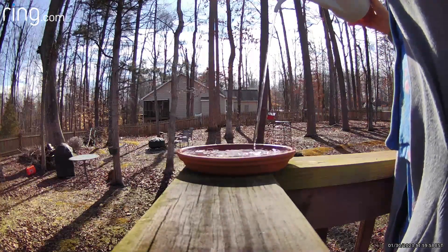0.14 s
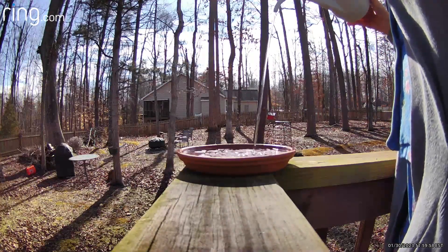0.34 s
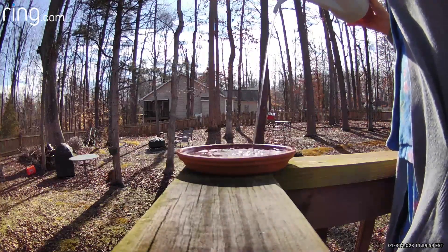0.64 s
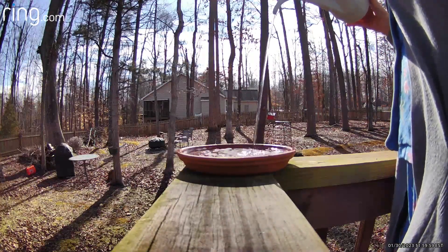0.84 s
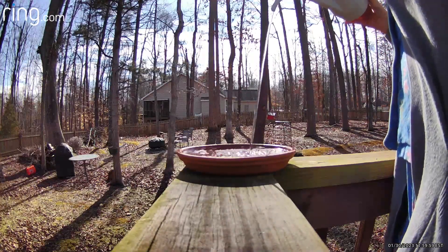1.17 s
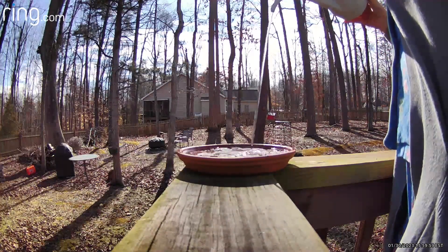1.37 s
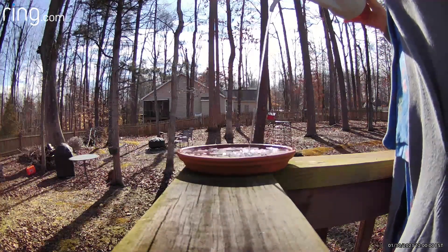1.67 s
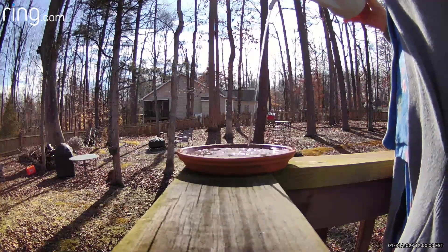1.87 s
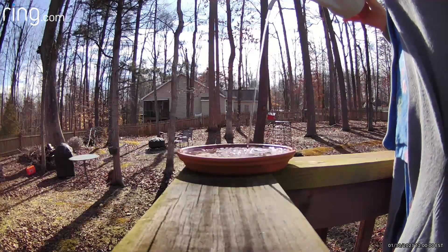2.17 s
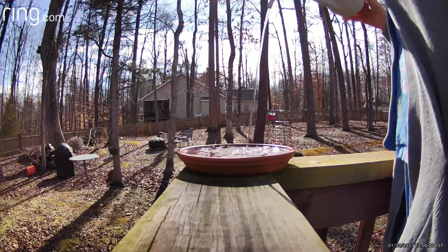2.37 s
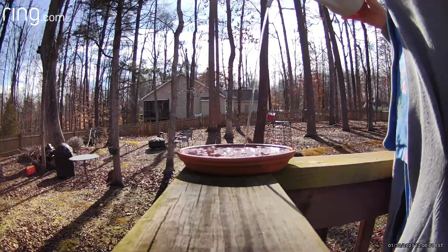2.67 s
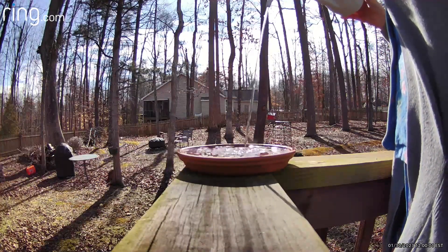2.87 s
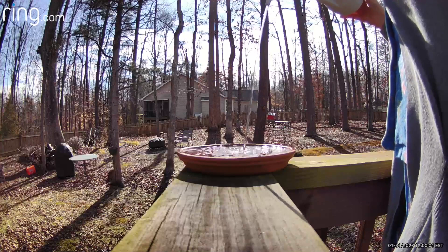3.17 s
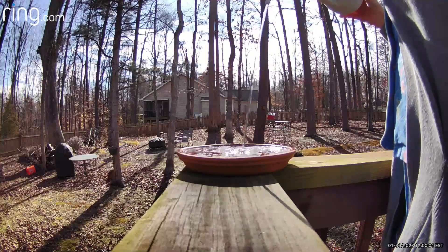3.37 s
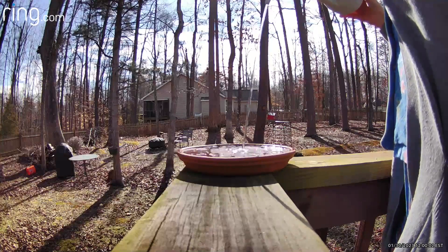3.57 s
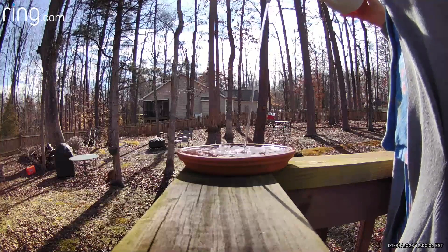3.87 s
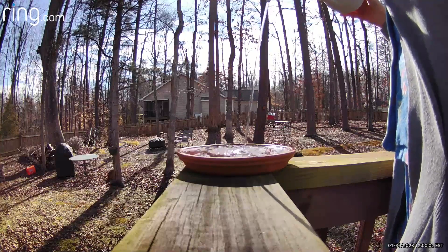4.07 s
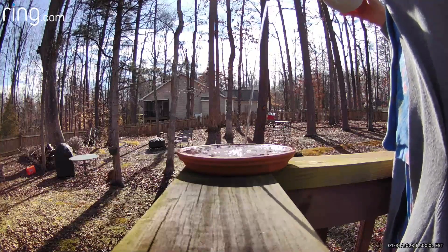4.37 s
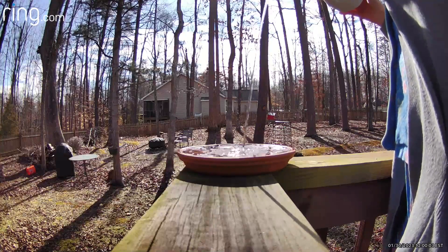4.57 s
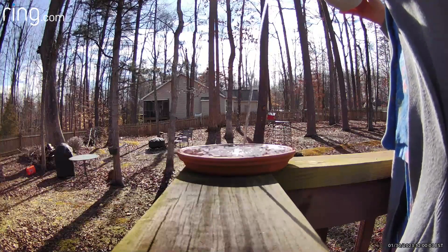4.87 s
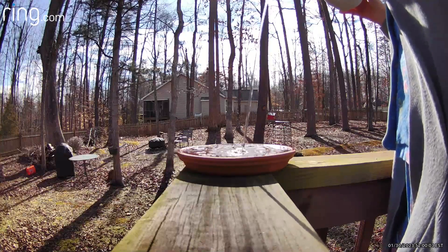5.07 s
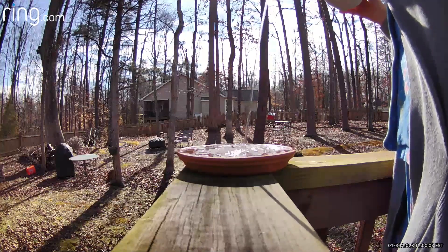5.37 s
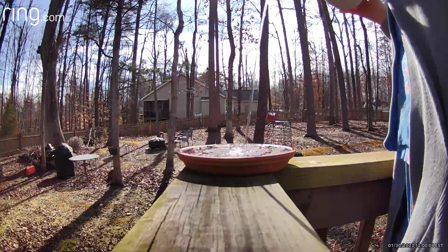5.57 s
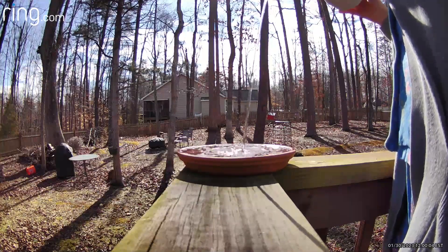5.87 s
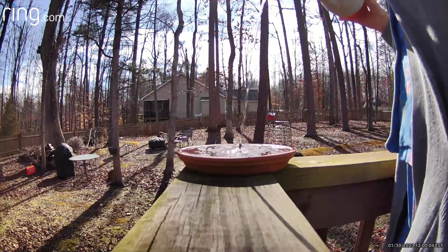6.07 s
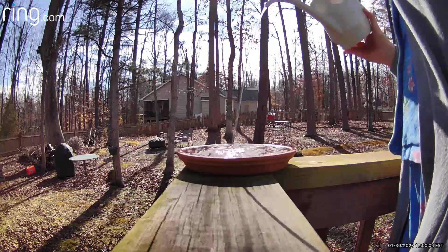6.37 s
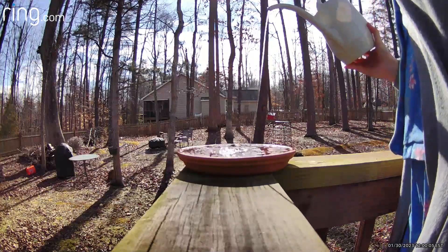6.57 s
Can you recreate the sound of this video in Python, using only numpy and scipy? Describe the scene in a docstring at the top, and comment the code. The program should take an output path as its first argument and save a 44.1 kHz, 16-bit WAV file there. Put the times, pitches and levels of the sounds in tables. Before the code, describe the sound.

Close mono pickup of water being poured from a can into a birdbath in a quiet yard. First a smooth, thin, bubbly trickle with a few high plinks, gradually weakening until almost silent. Then the stream comes back abruptly, lumpier and louder, with many bright bubble pops, round low plops and a wavering ring from the dish. Little bass, faint rail rumble, barely audible air behind.

```python
"""First an even patter with fine spray and bright plinks: a thin stream into a birdbath on an outdoor deck rail.
It thins to a few drops, then returns in lumps that slap the water and ring the dish.
Patter and spray are crowds of small gliding bubble tones mixed with patchy noise; the dish is a set of resonances.
Plinks and round low notes are single rising tones. Low noise drums on the rail, a hollow tone gurgles late.
Faint air lies behind. All is heard in mono, dull above 7 kHz; no distances are modelled."""
import sys
import numpy as np
from scipy import signal
from scipy.fft import rfft, irfft, next_fast_len
from scipy.io import wavfile
from scipy.ndimage import uniform_filter1d, map_coordinates

SR = 44100
rng = np.random.default_rng(int(sys.argv[2]) if len(sys.argv) > 2 else 0)


def unload_wav(signal):
    """Save mono or channel-first audio to the path in sys.argv[1] as 16-bit WAV at rate SR, clipped to [-1, 1]."""
    wavfile.write(
        sys.argv[1],
        SR,
        np.round(np.clip(np.atleast_2d(signal).T, -1, 1) * 32767).astype(np.int16),
    )


N = 296793


def amp(db):
    """Decibels to gain."""
    return 10 ** (np.asarray(db) / 20)


def unit(x):
    """x at rms 1."""
    return x / np.sqrt(np.mean(x ** 2) + 1e-20)


def curves(rows):
    """One value per sample for each column after the time."""
    times, *columns = np.transpose(rows)
    return [np.interp(np.arange(N) / SR, times, column) for column in columns]


def wobble(rate):
    """A smooth random curve through normal knots, rate knots a second."""
    knots = rng.standard_normal(int(N * rate / SR) + 4)
    return map_coordinates(knots, [np.arange(N) * rate / SR])


def filtered(x, response):
    """x times a complex response of frequency."""
    size = next_fast_len(N + SR // 2)
    spectrum = rfft(x, size) * response(np.fft.rfftfreq(size, 1 / SR))
    return irfft(spectrum, size)[:N]


def coloured(x, points):
    """x shaped by (f/Hz, level/dB) points joined over log frequency, at rms 1."""
    f, db = np.transpose(points)
    return unit(filtered(x, lambda hz: amp(np.interp(np.log(hz + 1), np.log(f), db))))


def resonate(x, modes):
    """x through (f/Hz, width/Hz, level/dB) resonances, each of two equal stages for steep skirts."""
    return filtered(x, lambda f: sum(amp(db) / (1 + 1j * (f - centre) / width) ** 2
                                     for centre, width, db in modes))


def add(track, s, sound):
    """Mix a sound in at time s."""
    part = track[max(round(s * SR), 0):][:len(sound)]
    part += sound[:len(part)]


# relative colour of the patter and of the spray: f/Hz, level/dB
PATTER_COLOUR = [(80, -56), (300, -48.5), (600, -5), (850, -17), (1300, -2), (1900, 6.5), (2700, -3.5),
                 (3100, -13), (5000, -37.5)]
SPRAY_COLOUR = [(60, -51), (400, -27), (1500, -20.5), (2600, 0), (2950, -5), (3300, -1), (5250, -2.5),
                (6100, -10), (7000, -10), (8500, -9)]
# narrow bands in which the smooth stream sings: f/Hz, width/Hz, relative level/dB
SINGING_BANDS = [(1083, 59, -4), (1900, 68, -2), (2640, 65, 2), (3900, 37, -2)]


def splash():
    """Larger bubbles patter and fine ones spray; the smooth stream sings, the lumpy one rings the dish."""
    patter, spray = flow(rise_s=.0014, flutter_db=1.1, clump_rate=24, clump_s=.004, clump_size=8)
    shake = shaking()
    large = froth(rate=900, low_hz=850, high_hz=3200, cycles=10, spread_db=1.8, glide=.05)
    fine = froth(rate=1300, low_hz=2400, high_hz=7200, cycles=17, spread_db=2.2, glide=.07)
    bubbly = .48  # share of the power in separate bubbles; the rest is wash

    def water_texture(bubbles, colour):
        mixed = np.sqrt(bubbly) * bubbles + np.sqrt(1 - bubbly) * wash(patchy_db=0.5)
        return coloured(scattered(mixed, share=0.37, decay_s=0.004), colour)

    body = water_texture(large, PATTER_COLOUR)
    fizz = water_texture(fine, SPRAY_COLOUR)
    # the singing gives way as the dish takes over
    sing = 0.82 * np.abs(1 - shake) * unit(resonate(wash(patchy_db=11.5), SINGING_BANDS))
    # the power that goes into the dish is taken from the patter
    force = patter / np.sqrt(1.62 + shake ** 2)
    water = force * (body + sing) + dish(force * shake) + fizz * spray
    # the splash stays thin in the bass: cut below 620 Hz
    low_cut = signal.butter(4, 620, "high", fs=SR, output="sos")
    return signal.sosfilt(low_cut, water)


# the heavier lumps landing: t/s, slap level/dB and spray level/dB (before the gains below), decay of power/s
LUMPS = [(0.231, -36, -48, 0.019), (0.387, -44, -30, 0.0036), (0.689, -35, -42.5, 0.011),
         (0.742, -41.5, -47, 0.038), (1.007, -29.5, -35, 0.0017), (1.283, -41, -40, 0.015),
         (1.637, -45.5, -44, 0.0098), (1.743, -35, -60, 0.019), (1.863, -37.5, -37.5, 0.0059),
         (1.914, -30, -31, 0.0014), (2.08, -41.5, -43.5, 0.013), (2.222, -47.5, -41, 0.016),
         (2.391, -39.5, -40, 0.0049), (2.504, -42, -43.5, 0.01), (2.598, -36.5, -64, 0.0081),
         (2.638, -48.5, -46.5, 0.006), (2.838, -41, -46.5, 0.0062), (3.005, -52, -54, 0.0042),
         (3.164, -38, -68, 0.015), (3.335, -36, -85, 0.0067), (3.425, -25.5, -37, 0.0064),
         (3.589, -31.5, -33, 0.0058), (3.628, -34, -44, 0.019), (3.802, -31.5, -56, 0.0069),
         (3.95, -30, -44, 0.007), (4.067, -43, -33, 0.0026), (4.156, -39, -56, 0.0055),
         (4.402, -37.5, -37, 0.015), (4.534, -43, -41.5, 0.005), (4.666, -35, -43.5, 0.013),
         (4.712, -37, -44, 0.0039), (4.804, -31.5, -33.5, 0.0057), (5.257, -38, -52.5, 0.038),
         (5.397, -41, -65, 0.0054), (5.478, -36, -41, 0.0055), (5.546, -31.5, -43.5, 0.0071),
         (5.9, -32.5, -71, 0.0057), (6.118, -27, -50, 0.0036), (6.303, -38, -86, 0.017),
         (6.464, -33.5, -43, 0.007), (6.504, -42.5, -49, 0.0017), (6.604, -29, -49.5, 0.0032)]
SLAP_DB, SLAP_SPRAY_DB = -7, -3.5  # gain of each layer of a lump


def flow(rise_s, flutter_db, clump_rate, clump_s, clump_size):
    """Strength of patter and of spray: the fluttering stream, its small clumps, and each lump that lands."""
    patter_db, spray_db = stream()
    t = np.arange(SR // 6) / SR
    onset = (1 - np.exp(-t / rise_s)) ** 2
    drops = (rng.random(N) < clump_rate / SR) * (.5 + rng.random(N))
    clump_shape = onset * np.exp(-t / clump_s)
    # clumps grow as the stream turns lumpy
    clumpy = clump_size * (1 + np.minimum(shaking(), 1)) / 2
    clumps = 1 + clumpy * np.abs(signal.fftconvolve(drops, clump_shape)[:N])
    surge = amp(flutter_db * wobble(45)) ** 2 * clumps / clumps.mean()
    # powers add: stream first, lumps on top
    patter = surge * amp(patter_db) ** 2
    spray = surge * amp(spray_db + flutter_db * wobble(48)) ** 2
    for s, slap_db, mist_db, decay_s in LUMPS:
        slap = onset * np.exp(-t / decay_s)
        add(patter, s, amp(slap_db + SLAP_DB) ** 2 * slap)
        add(spray, s, amp(mist_db + SLAP_SPRAY_DB) ** 2 * slap)
    return np.sqrt(patter), np.sqrt(spray)


# the steady part of the stream, before and after it returns in lumps:
# t/s, patter level/dB, spray level/dB (before the layer gains below)
SMOOTH_STREAM = [(0.0, -55, -50), (0.34, -53.5, -48), (0.9, -59.5, -50.5), (1.31, -53, -53.5),
                 (1.45, -60.5, -52), (1.95, -64, -53.5), (2.74, -74, -60.5), (2.86, -72.5, -63.5),
                 (3.09, -78, -70.5)]
LUMPY_STREAM = [(3.18, -58, -58), (3.31, -52.5, -56.5), (3.57, -56.5, -54), (3.759, -52.5, -60),
                (4.28, -57.5, -52.5), (4.56, -55, -52.5), (4.9, -54.5, -56.5), (5.442, -60, -53),
                (5.749, -60.5, -57.5), (6.0, -60, -51.5), (6.221, -48.5, -53), (6.33, -53.5, -53.5),
                (6.73, -61, -64.5)]
# the stream breaks off for an instant: t/s, depth/dB
STREAM_BREAKS = [(1.601, 7.5), (2.46, 7), (2.702, 13), (2.96, 7), (4.207, 12), (4.898, 8), (5.819, 7.5),
                 (6.269, 6)]
BREAK_S = 0.041  # half the length of a break
PATTER_DB, SPRAY_DB = 0.5, -2.5  # gain of each layer


def stream():
    """Levels of patter and spray in dB; both sink wherever the stream breaks."""
    t = np.arange(N) / SR
    patter_db, spray_db = curves(np.vstack([SMOOTH_STREAM, LUMPY_STREAM]))
    gap_db = sum(depth * np.exp(-((t - s) / BREAK_S) ** 2) for s, depth in STREAM_BREAKS)
    return patter_db + PATTER_DB - gap_db, spray_db + SPRAY_DB - gap_db


LUMPY_FROM_S, TURN_S = 3.08, 0.049  # when the stream turns lumpy, and how long the turn takes
SMOOTH_SHAKE_DB, LUMPY_SHAKE_DB = -28.5, 1  # relative to the patter


def shaking():
    """How hard the water shakes the dish: barely while smooth, fully once it falls in lumps."""
    lumpy = np.clip((np.arange(N) / SR - LUMPY_FROM_S) / TURN_S, 0, 1)
    return amp(SMOOTH_SHAKE_DB + (LUMPY_SHAKE_DB - SMOOTH_SHAKE_DB) * lumpy)


# resonances of the filled dish: f/Hz, width/Hz, relative level/dB
DISH_MODES = [(470, 83, -11.5), (851.5, 42, 1.5), (1067, 57.5, 7), (1010, 210, -5)]
# knots a second of the sloshing, and the typical time by which the ringing runs ahead or lags
SLOSH_RATE, SLOSH_S = 14, .0005


def dish(force):
    """The falling water rings the dish; as it sloshes, the notes slide up and down together."""
    drive = wash(patchy_db=3.5)
    ring = resonate(force * drive, DISH_MODES) / np.std(resonate(drive, DISH_MODES))
    return map_coordinates(ring, [np.arange(N) + SLOSH_S * SR * wobble(SLOSH_RATE)])


def froth(rate, low_hz, high_hz, cycles, spread_db, glide):
    """A crowd of small bubbles of all sizes, each swelling, gliding a little and dying; rms 1."""
    count = int(rate * N / SR)
    when, size, strength, bend = rng.random((count, 4)).T[:, :, None]
    hz = low_hz * (high_hz / low_hz) ** size
    k = np.arange(int(np.clip(3 * cycles / low_hz, .004, .03) * SR))
    turns = hz * k / SR
    age = turns / cycles
    turns = turns * (1 + glide * (2 * bend - 1) * np.tanh(age / 2))
    # loud bubbles are rare; small ones die sooner
    loudness = amp(-spread_db * np.log(strength + 0.0067)) * np.sqrt(hz)
    grains = loudness * age ** 2 * np.exp(-np.pi * age) * np.sin(2 * np.pi * turns)
    places = (when * N).astype(int) + k
    return unit(np.bincount(places.ravel(), grains.ravel(), N)[:N])


def wash(patchy_db):
    """The hiss of tearing water, swelling in brief patches of different pitch; rms 1."""
    z = signal.stft(rng.standard_normal(N), nperseg=256)[2]
    # random patches 8 bins high and 6 frames long
    field = uniform_filter1d(rng.standard_normal(z.shape), size=8, axis=0, mode="wrap")
    field = unit(uniform_filter1d(field, size=6, axis=1))
    patchy = z * amp(patchy_db * np.minimum(field, 2))
    return unit(signal.istft(patchy, nperseg=256)[1][:N])


def scattered(x, share, decay_s):
    """x plus its dense, brief echoes between water, rim and rail."""
    t = np.arange(SR // 40) / SR
    echoes = rng.standard_normal(len(t)) * t * np.exp(-t / decay_s)
    return x + share * signal.fftconvolve(x, echoes / np.linalg.norm(echoes))[:len(x)]


# the loudest single bubbles: t/s, level/dB, f/Hz at the peak, about which the pitch climbs
LOUD_BUBBLES = [(0.0869, -32.5, 2790), (0.171, -31, 4800), (1.039, -36, 3670), (1.066, -36, 3000),
                (1.3125, -34, 3070), (1.8245, -38.5, 3520), (2.1742, -23, 4430), (2.3907, -27, 4000),
                (2.449, -54, 3200), (2.6458, -46.5, 4140), (2.722, -54, 4400), (2.7623, -42, 5260),
                (2.7977, -35.5, 3950), (2.8643, -51.5, 5470), (3.177, -38.5, 5300), (3.2744, -27.5, 3120),
                (3.2927, -22.5, 5120), (3.4276, -28.5, 5150), (3.5753, -26.5, 5060), (3.662, -31.5, 3530),
                (3.817, -31, 5360), (3.903, -30, 4750), (4.371, -23, 3910), (4.4023, -19.5, 3510),
                (4.713, -30, 4770), (4.777, -34, 5100), (5.0404, -28, 5350), (5.0981, -22.5, 3450),
                (5.1842, -31, 4660), (5.228, -22, 5040), (5.545, -24, 2600), (5.5732, -29, 3490),
                (5.6569, -20, 4320), (5.7687, -34, 4560), (5.9494, -31, 3450), (5.959, -21, 4730),
                (5.9959, -19.5, 3550), (6.09, -27.5, 3430), (6.1747, -23, 6600), (6.4108, -31, 3440)]
PLINK_CYCLES, QUIET_RINGS_DB = 1.21, 0.5938  # cycles to the peak of the loudest; dB of extra life per dB softer


def plinks(tail_db, tail_s, rise, before_db, after_db):
    """Trapped bubbles snap shut and ring, climbing in pitch; soft ones last longer, fainter ones flank each."""
    out, t = np.zeros(N), np.arange(SR // 30) / SR

    def bubble(hz, cycles):
        climb = 1 + rise * np.tanh((t - cycles / hz) / tail_s / 2)
        turns = np.cumsum(hz * climb) / SR
        age = turns / cycles
        snap = (age * np.exp(1 - age)) ** 2
        tail = amp(tail_db) * np.tanh(age / 2) ** 2 * np.exp(-t / tail_s)
        return np.sin(2 * np.pi * turns) * (snap + tail)

    loudest_db = max(row[1] for row in LOUD_BUBBLES)
    all_twins = rng.random((len(LOUD_BUBBLES), 2, 2))
    for (s, db, hz), twins in zip(LOUD_BUBBLES, all_twins):
        cycles = PLINK_CYCLES * amp(QUIET_RINGS_DB * (loudest_db - db))
        add(out, s, amp(db) * scattered(bubble(hz, cycles), share=.3, decay_s=.002))
        # one fainter bubble 2 to 8 ms before and one after, within half an octave
        for (delay, pitch), side, twin_db in zip(twins, (-1, 1), (before_db, after_db)):
            twin = bubble(hz * 2 ** (pitch - .5), 2 * cycles)
            add(out, s + side * (.002 + .006 * delay), amp(db + twin_db) * twin)
    return out


# round low notes, of big bubbles or of the struck dish:
# t/s, level/dB before LOW_NOTE_DB, f/Hz about which the pitch climbs
LOW_NOTES = [(0.39, -22.5, 1710), (1.752, -26, 1260), (2.6, -33.5, 1490), (3.629, -30.5, 1800),
             (4.073, -21, 1030), (4.812, -21.5, 1104), (5.403, -23.5, 1840), (6.121, -23, 1990),
             (6.302, -27.5, 1460), (6.312, -23.5, 920), (6.506, -26, 1610), (6.605, -27, 853),
             (6.631, -28, 1720)]
LOW_SWELL_S, LOW_RISE, LOW_NOTE_DB = 0.0016, 0.036, -12.5  # time to the peak, pitch swing either way, gain
# the quick bubbles after each note: level re the note, longest delay, scale of their pitch spread
SHED_DB, SHED_WITHIN_S, SHED_OCTAVES = -6, 0.02, 0.31


def low_notes():
    """Each round, low note swells, climbs a little in pitch, and is followed by a few quick bubbles."""
    out, t = np.zeros(N), np.arange(SR // 25) / SR

    def note(hz, swell_s):
        age = t / swell_s
        turns = np.cumsum(hz * (1 + LOW_RISE * np.tanh(age / 2 - 1))) / SR
        return age * np.exp(1 - age) * np.sin(2 * np.pi * turns)

    all_shed = rng.random(size=(len(LOW_NOTES), 4, 2))
    for (s, db, hz), shed in zip(LOW_NOTES, all_shed):
        add(out, s, amp(db + LOW_NOTE_DB) * note(hz, LOW_SWELL_S))
        for delay, pitch in shed:
            # mostly higher than the note
            small = note(hz * 2 ** (SHED_OCTAVES * (2 * pitch - .5)), LOW_SWELL_S / 2)
            add(out, s + delay * SHED_WITHIN_S, amp(db + LOW_NOTE_DB + SHED_DB) * small)
    return out


def stray_bubbles(high_db, low_db):
    """Small plinks and rounder bubbles rise in bunches; the plinks grow once the stream falls in lumps."""
    patter_db, spray_db = stream()
    high = froth(rate=80, low_hz=2800, high_hz=6000, cycles=7, spread_db=2.4, glide=.12)
    low = froth(rate=90, low_hz=1500, high_hz=3800, cycles=11, spread_db=2.2, glide=.04)

    def bunched(x):
        return unit(x * amp(6 * np.tanh(wobble(22))))

    share = np.clip(shaking(), .25, 1)
    small_plinks = share * amp(spray_db + high_db) * bunched(high)
    return small_plinks + amp(patter_db + low_db) * bunched(low)


# the weight of the stream on the dish: t/s, mean drumming level/dB
DRUM_LEVEL = [(0.0, -89.5), (0.62, -84.5), (1.98, -71), (2.25, -76.5), (2.55, -82), (3.04, -95.5),
              (3.41, -69.5), (3.73, -78.5), (6.09, -79), (6.41, -76.5), (6.73, -70)]
# relative colour of the wooden rail: f/Hz, level/dB
RAIL_COLOUR = [(25, -26), (75, -20), (135, -4.5), (195, -9), (255, -3), (330, -10.5), (600, -17),
               (2000, -33.5)]


def drumming():
    """The dish rumbles faintly on the wooden rail under the stream: low coloured noise of wavering level."""
    waver_db = 2 * wobble(25)
    return amp(curves(DRUM_LEVEL)[0] + waver_db) * coloured(rng.standard_normal(N), RAIL_COLOUR)


# swells of a hollow gurgle as the can is lowered: t/s at the start, length/s, level/dB before it is broken up
GURGLE_SWELLS = [(6.35, .12, -47), (6.465, .07, -51), (6.51, .12, -52.5)]
HOLLOW_HZ, HOLLOW_WAVER = 625, .022  # mean pitch, typical share by which it wavers


def gurgle():
    """A hollow, broken note of wavering pitch swells up three times near the end of the pour."""
    swells = np.zeros(N)
    for s, length, db in GURGLE_SWELLS:
        add(swells, s, amp(db) * np.hanning(int(length * SR)))
    turns = np.cumsum(HOLLOW_HZ * (1 + HOLLOW_WAVER * wobble(72))) / SR
    broken = (1 + np.tanh(wobble(90))) / 2
    return swells * broken * np.sin(2 * np.pi * turns)


# relative colour of the garden air: f/Hz, level/dB
AIR_COLOUR = [(25, -20.5), (140, -6.5), (7000, -25.5)]


def garden_air():
    """The faint air of a still garden: steady coloured noise."""
    return amp(-88.5) * coloured(rng.standard_normal(N), AIR_COLOUR)


def scene():
    """The pour into the birdbath, over the garden air."""
    bubbles = plinks(tail_db=-11, tail_s=.0028, rise=.14, before_db=-22, after_db=-13)
    strays = stray_bubbles(high_db=-3, low_db=-6)
    return (splash() + bubbles + low_notes() + strays + drumming() + gurgle() + garden_air())[None]


TOP_HZ = 7000  # upper band limit of the sound


def record(dry):
    """The sound is dull above 7 kHz, with only very faint treble there."""
    def gain(hz):
        band = 1 / np.sqrt(1 + (hz / TOP_HZ) ** 240)
        faint_treble = amp(-28 - hz / 1500) * (hz < 15500)
        return band + faint_treble

    return filtered(dry[0], gain)[None]


dry = scene()
out = record(dry)
unload_wav(out)
```